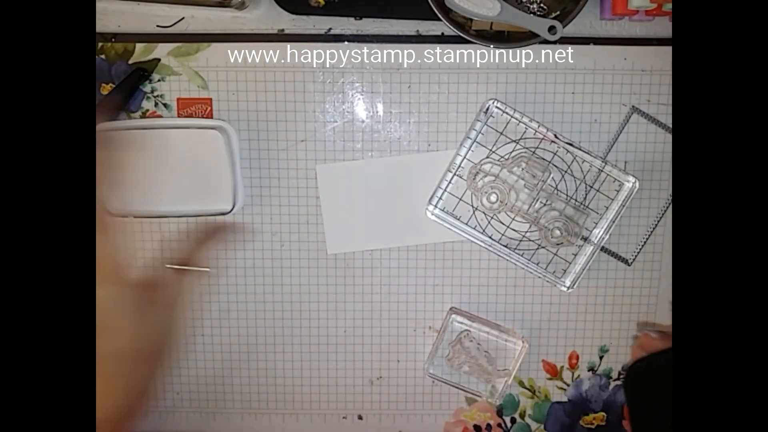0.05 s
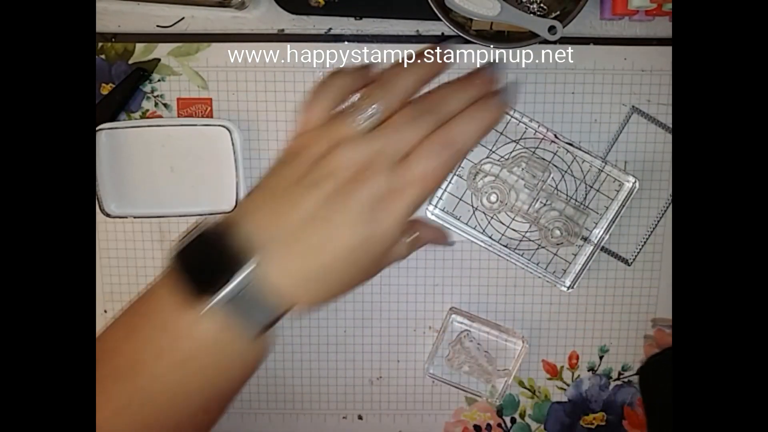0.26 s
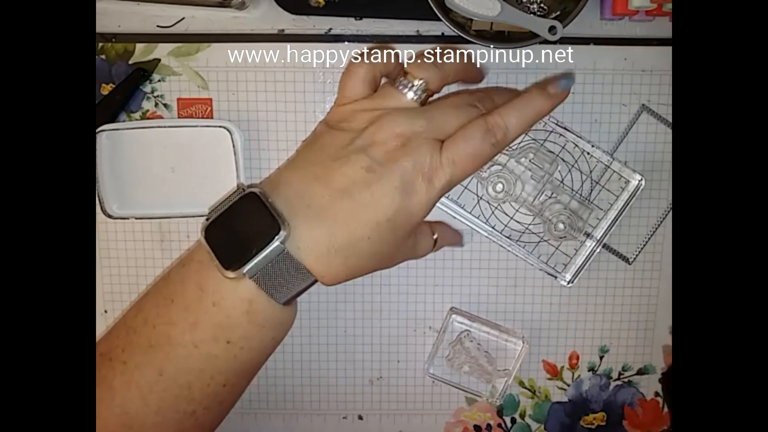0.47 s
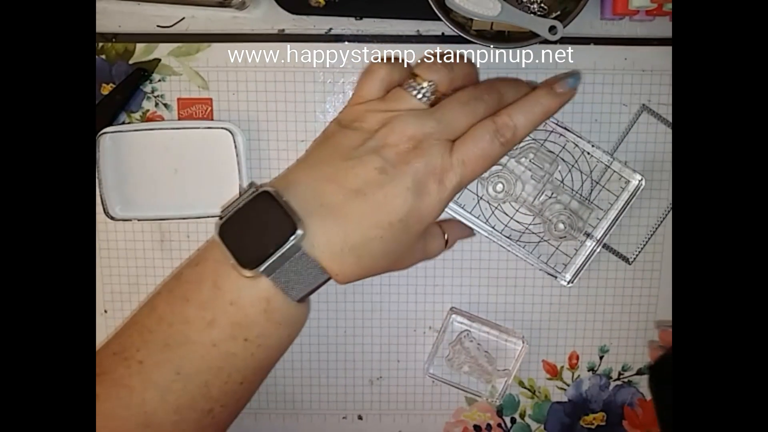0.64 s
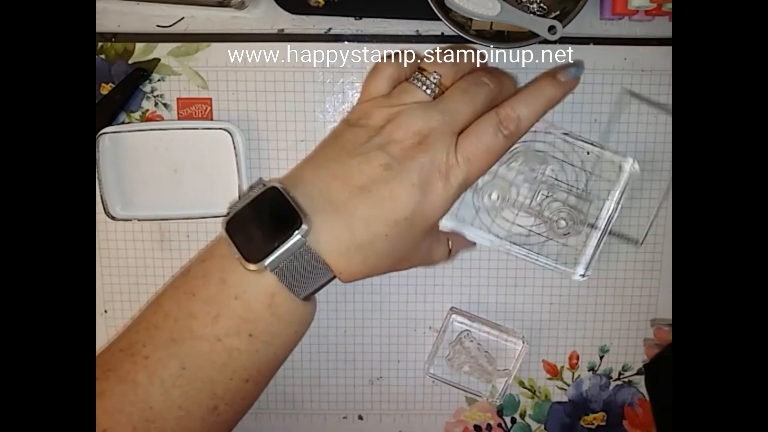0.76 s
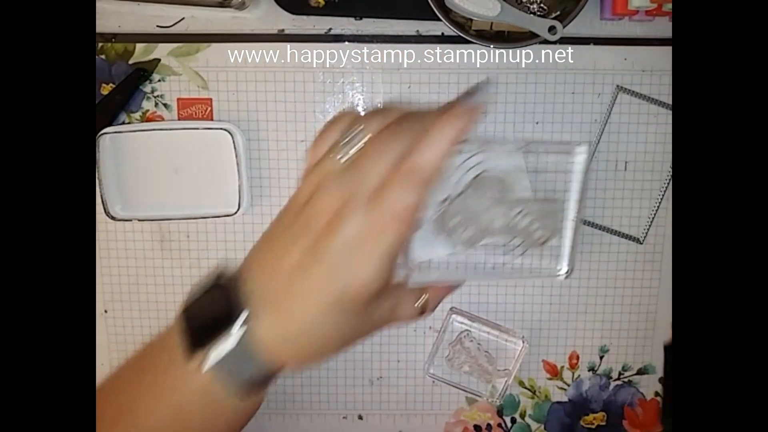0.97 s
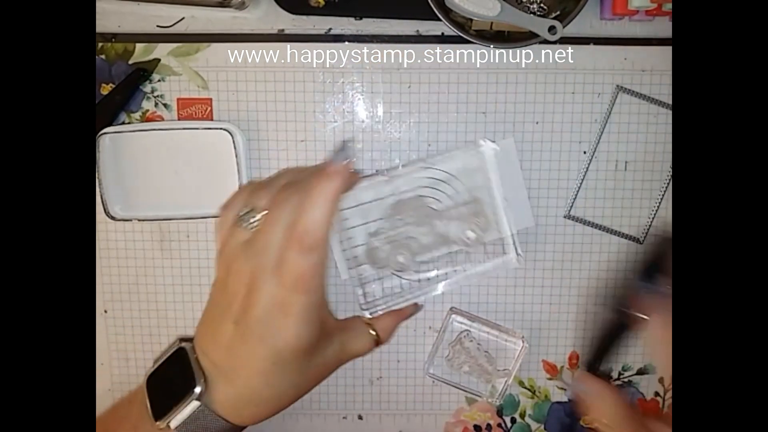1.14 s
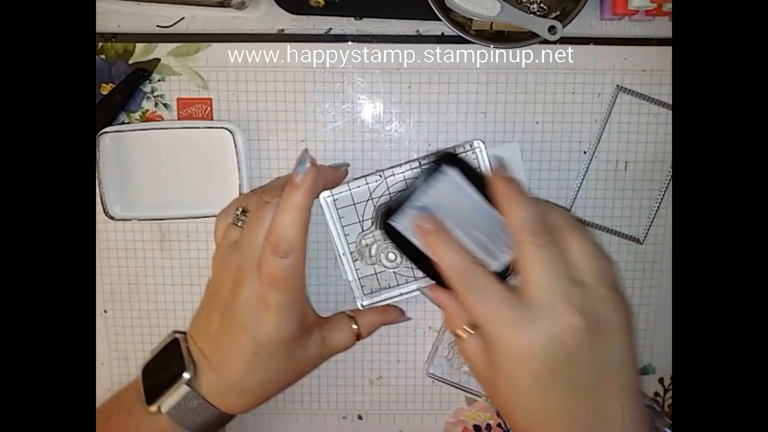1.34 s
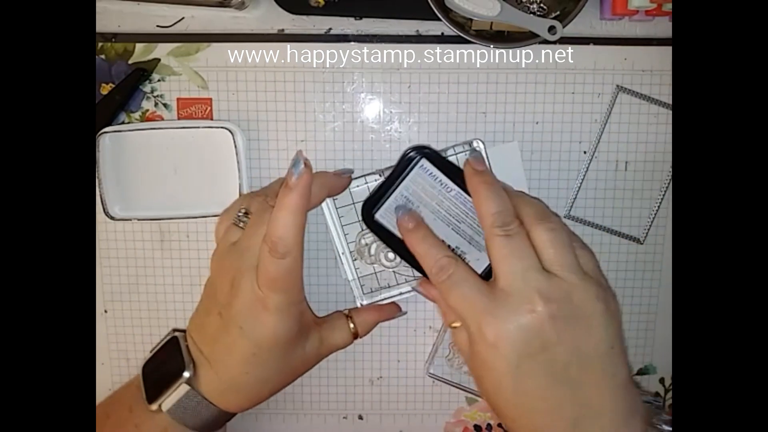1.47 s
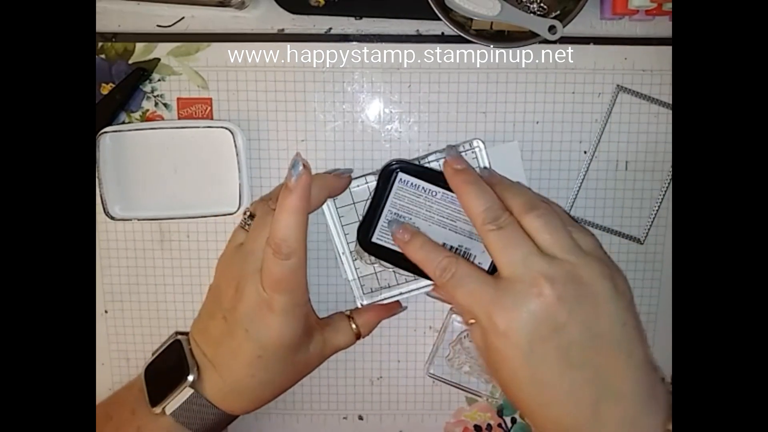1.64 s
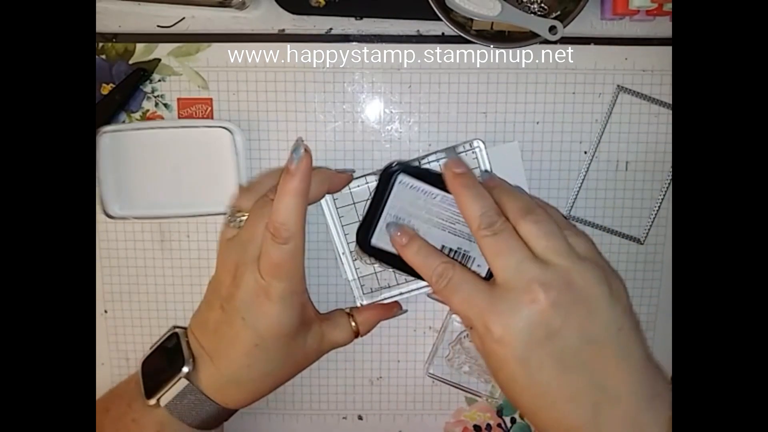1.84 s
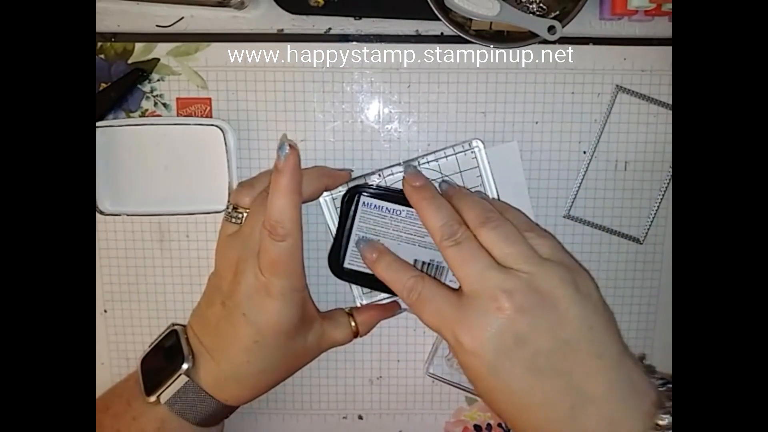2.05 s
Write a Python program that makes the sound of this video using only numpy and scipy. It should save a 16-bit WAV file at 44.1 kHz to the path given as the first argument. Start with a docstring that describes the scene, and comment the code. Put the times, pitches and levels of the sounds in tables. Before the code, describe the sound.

Close up in a small, lightly reverberant room, a hard plastic block rattles loudly, soft bumps and a metal clink follow, then a brief scrape, a woody set-down thump and scattered sticky taps over faint low rumble.

```python
"""Close up at a craft table in a small room, a hand slides in and knocks an acrylic block, which rattles.
Soft bumps of hand and pad begin, a metal ring clinks twice, and the block's edge drags briefly over paper.
The block is set down with a thump, among bumps and sticky ticks of nails, plastic and ink that go on to the end.
Hard contacts are short noise bursts and ringing tones; rubbing is a stream of random jolts.
The room adds reverberation to all of these, over a steady low rumble and hiss."""
import sys
import numpy as np
from scipy import signal
from scipy.fft import rfft, irfft
from scipy.io import wavfile

SR = 44100
rng = np.random.default_rng(int(sys.argv[2]) if len(sys.argv) > 2 else 0)


def pcm_store(signal):
    """Save signal as 16-bit PCM."""
    levels = np.round(np.clip(np.atleast_2d(signal), -1, 1) * 32767)
    wavfile.write(sys.argv[1], SR, levels.astype(np.int16).T)


N = 92610  # length in samples: 2.1 s


def from_db(db):
    """Turn decibels into a multiplier."""
    return 10 ** (np.asarray(db) / 20)


def rms_one(x):
    """Scale a sound to an average power of one."""
    return x / np.sqrt(np.mean(x ** 2) + 1e-20)


def at_hz(points, hz, axis=1):
    """Read a table column between its rows, with frequency spaced by ratio as the ear hears it."""
    points = np.array(points)
    return np.interp(np.log(hz + 1e-9), np.log(points[:, 0]), points[:, axis])


def convolve(x, response):
    """Let every sample of a sound set off a copy of the response."""
    return signal.fftconvolve(x, response)[:N]


def colour(x, spectrum):
    """Filter a sound to a spectrum with minimum phase, so that nothing sounds before its cause."""
    size = 8192
    hz = np.arange(size // 2 + 1) * SR / size
    cepstrum = irfft(np.log(from_db(at_hz(spectrum, hz))))
    # folding the cepstrum's second half onto its first gives minimum phase
    fold = np.r_[1, np.full(size // 2 - 1, 2), 1, np.zeros(size // 2 - 1)]
    return convolve(x, irfft(np.exp(rfft(cepstrum * fold))))


def clicks(rows):
    """Place a one-sample push for each (time [s], level [dB])."""
    out = np.zeros(N)
    for s, db in rows:
        out[int(np.clip(s * SR, 0, N - 1))] += from_db(db)
    return out


def bursts(rows, decay_s):
    """Place a flurry of tiny contacts, as fast-dying noise, for each (time [s], level [dB])."""
    size = 4096
    out = np.zeros(N + size)
    dying = from_db(-60 * np.arange(size) / SR / decay_s)
    for s, db in rows:
        spectrum = rfft(rng.standard_normal(size) * dying)
        flat = irfft(spectrum / np.abs(spectrum))  # every frequency equally strong
        flurry = flat * np.sqrt(dying)  # quieten what the flattening spread out in time
        start = int(np.clip(s * SR, 0, N - 1))
        out[start:start + size] += from_db(db) * flurry / np.linalg.norm(flurry)
    return out[:N]


def ring(force, modes):
    """Let a force set off a body's dying tones, whose signs alternate from one to the next."""
    t = np.arange(SR // 2) / SR
    response = np.zeros(len(t))
    for k, (hz, db, t60) in enumerate(modes):
        response += (-1) ** k * from_db(db - 60 * t / t60) * np.sin(2 * np.pi * hz * t)
    return convolve(force, response)


def friction(level, spectrum, modes):
    """Rub by stick and slip: random jolts excite a body, and a level curve sets the loudness."""
    slips_per_s, spread_db = 1800, 3.5  # average rate; spread of the jolts' strength
    happens = rng.random(N) < slips_per_s / SR
    strength = from_db(spread_db * np.clip(rng.standard_normal(N), -2, 2))
    slips = happens * strength * rng.choice([-1, 1], N)
    rub = rms_one(colour(slips, spectrum) + ring(slips, modes))
    s, db = np.transpose(level)
    # silent outside the curve
    return rub * from_db(np.interp(np.arange(N) / SR, s, db, left=-np.inf, right=-np.inf))


# clacks of the block: (time [s], level [dB], knock on the table relative to the clack [dB])
CLACKS = [(0.0565, -35, 3), (0.0705, -44, 5), (0.0865, -22.5, 6.5), (0.1122, -32, 8), (0.1272, -38.5, 4),
          (0.1388, 0.5, -11), (0.1455, -5.5, 5), (0.1490, -6.5, -2.5), (0.1580, -20, -2),
          (0.2140, -32.5, 18), (0.2355, -23.5, 2), (0.2530, -21.5, -5), (0.2634, -18, 2.5),
          (0.3095, -57, -14), (0.328, -62, 23)]
# tones of the acrylic: (frequency [Hz], level [dB], time to fall by 60 dB [s])
BLOCK_MODES = [(2035, -27.5, .03), (2370, -17.5, .018), (2540, -22, .04), (2680, -19, .028),
               (2840, -26, .05), (3850, -12, .015), (3975, -33.5, .06), (5020, -32.5, .03),
               (5330, -17.5, .008), (6250, -28, .012), (10860, -39.5, .025)]
# spectrum of the contact crack: (frequency [Hz], level [dB])
CRACK_SPECTRUM = [(200, -18), (700, -21), (1100, -3), (3200, 10), (5500, 7.5), (6600, 3), (7600, -9.5),
                  (11000, -12), (16000, -20.5)]
# spectrum of the knocked table top: (frequency [Hz], level [dB])
KNOCK_SPECTRUM = [(60, -20.5), (150, -5.5), (300, 6), (520, 11), (950, 5), (1600, 7), (3000, -8.5),
                  (9000, -34)]


def block_rattle():
    """Each clack cracks at the contact, rings the stiff acrylic and knocks the table under it."""
    hits = [(s, db) for s, db, weight in CLACKS]
    knocks = [(s, db + weight) for s, db, weight in CLACKS]
    tones = ring(clicks(hits), BLOCK_MODES)
    cracks = colour(bursts(hits, decay_s=.014), CRACK_SPECTRUM)
    table_knocks = colour(bursts(knocks, decay_s=.04), KNOCK_SPECTRUM)
    return tones + cracks + table_knocks


# spectrum of the snap of the block's edge: (frequency [Hz], level [dB])
SNAP_SPECTRUM = [(80, 9), (250, 17), (550, 13), (900, 7), (1500, 9.5), (2300, -9.5), (3000, -3.5),
                 (5500, -5.5), (8000, -20.5), (16000, -38)]
# tones of the set-down: the table top's low tones, and above 1 kHz the block's own thunk (frequency [Hz], level
# [dB], time to fall by 60 dB [s])
THUMP_MODES = [(89, -70, .3), (130, -37, .3), (205, -20, .05), (226, -26, .22), (335, -19.5, .035),
               (495, -34, .12), (1330, -22, .012), (1810, -22, .02), (3010, -24.5, .012)]


def set_down():
    """The block's edge snaps onto the table, then its weight makes the top boom and the block thunk."""
    snap_s, thump_lag_s = 1.2592, .0012
    snap = colour(bursts([(snap_s, 0)], decay_s=.012), SNAP_SPECTRUM)
    thump = ring(clicks([(snap_s + thump_lag_s, 0)]), THUMP_MODES)
    return snap + thump


# loudness of the drag: (time [s], level [dB])
DRAG_LEVEL = [(0.862, -90), (0.871, -56.5), (0.884, -48), (0.900, -41), (0.916, -39.5), (0.925, -41.5),
              (0.930, -60), (0.950, -77), (0.960, -83)]
# spectrum of the slips: (frequency [Hz], level [dB])
DRAG_SPECTRUM = [(200, -12), (1200, -14), (2300, -16.5), (3200, 5), (5300, 5), (7500, -18.5), (11000, -26),
                 (16000, -25)]
# tones the slips excite: (frequency [Hz], level [dB], time to fall by 60 dB [s])
DRAG_MODES = [(3580, -25.5, .012), (4280, -30.5, .01), (4530, -24.5, .02), (4910, -26.5, .02)]


def block_drag():
    """The block's edge sticks and slips over paper."""
    return friction(DRAG_LEVEL, DRAG_SPECTRUM, DRAG_MODES)


# clinks of the ring: (time [s], level [dB])
CLINKS = [(0.4386, 0), (0.5665, -19)]
# tones of the metal: (frequency [Hz], level [dB], time to fall by 60 dB [s])
RING_MODES = [(1443, -48, .02), (1790, -32.5, .025), (4850, -32, .014), (6174, -48, .04), (8280, -51, .08),
              (9110, -48, .05), (10245, -36, .06), (12400, -48, .05), (14450, -43, .045)]
# spectrum of the contact click: (frequency [Hz], level [dB])
RING_CLICK_SPECTRUM = [(200, -27), (900, -17), (1400, -15), (5000, -5.5), (7500, -24), (12000, -19),
                       (16000, -32)]


def ring_clinks():
    """A metal finger ring clicks on contact and rings briefly, mostly high up."""
    tones = ring(clicks(CLINKS), RING_MODES)
    return tones + colour(bursts(CLINKS, decay_s=.02), RING_CLICK_SPECTRUM)


# ticks of nails, plastic and tacky ink, and near 1.02 s a few scuffs of the block's edge: # (time [s], level
# [dB], ringing frequency [Hz], extra level of the ringing [dB])
TICKS = [(0.390, -13, 2600, 2.5), (0.6765, -11.5, 5500, -6.5), (0.8272, -0.5, 6800, -12.5),
         (1.0130, -12, 4500, 17), (1.0195, -8, 3650, 8.5), (1.0285, -6, 3600, 10), (1.0310, -9, 4450, 5),
         (1.141, -12.5, 3600, -1.5), (1.2372, 5, 3700, 6), (1.4128, -8, 2390, 8.5),
         (1.4185, -10.5, 4000, 4), (1.579, -6, 1600, -2.5), (1.662, -10, 5500, -15),
         (1.7320, -12.5, 4200, 7.5), (1.7850, 0.5, 5700, -3.5), (1.8888, 1.5, 5200, -0.5),
         (1.8960, 1.5, 6000, -13.5), (2.0215, 5, 5300, -3)]
# spectrum of the tick's snap: (frequency [Hz], level [dB])
TICK_SPECTRUM = [(200, -23), (1800, -39), (3200, -30.5), (5500, -24.5), (8000, -37), (16000, -43)]


def ticks():
    """Tiny bright contacts snap, and each excites one short resonance."""
    sound = colour(bursts([(s, db) for s, db, hz, extra_db in TICKS], decay_s=.009), TICK_SPECTRUM)
    for s, db, hz, extra_db in TICKS:
        mode = (hz, -46, .016)  # frequency [Hz], base level [dB], time to fall by 60 dB [s]
        sound = sound + ring(clicks([(s, db + extra_db)]), [mode])
    return sound


# soft bumps of hand and pad: (time [s], level [dB])
BUMPS = [(0.199, -4), (0.236, 7), (0.440, 2.5), (0.567, 3.5), (0.600, -15), (0.775, -6), (0.876, 3),
         (0.915, 6), (1.060, -23), (1.137, -10), (1.413, -7.5), (1.568, 7.5), (1.582, 5), (1.893, -4.5),
         (1.956, -7)]
# low tones of a bump: (frequency [Hz], level [dB], time to fall by 60 dB [s])
BUMP_MODES = [(115, -55, .12), (186, -49, .06), (260, -51.5, .035), (390, -55.5, .025)]


def soft_bumps():
    """Soft hand and pad contacts excite only a few low, short tones."""
    return ring(clicks(BUMPS), BUMP_MODES)


# loudness of the slide: (time [s], level [dB])
SLIDE_LEVEL = [(0, -42), (0.012, -40.5), (0.028, -47), (0.05, -43.5), (0.075, -57.5), (0.11, -62.5),
               (0.14, -68), (0.16, -108)]
# spectrum of the slips: (frequency [Hz], level [dB])
SLIDE_SPECTRUM = [(70, -14.5), (200, 9), (500, 7.5), (900, -2), (1500, 8.5), (2500, -11.5), (5000, -9),
                  (8000, -22.5), (16000, -24.5)]
# squeaking tones: (frequency [Hz], level [dB], time to fall by 60 dB [s])
SLIDE_MODES = [(1490, -45, .03), (1700, -29, .02), (4770, -32.5, .06), (4950, -37, .02)]


def hand_slide():
    """The hand sticks and slips over the table, exciting squeaking resonances."""
    return friction(SLIDE_LEVEL, SLIDE_SPECTRUM, SLIDE_MODES)


# the room: (frequency [Hz], reverberation level [dB], time to fall by 60 dB [s])
ROOM = [(100, -6.5, .45), (250, -11, .38), (700, -7, .34), (1800, -13, .3), (4200, -12, .33),
        (7000, -13.5, .28), (14000, -12.5, .2)]


def room(x):
    """Scattered reflections build up, then die away at a different speed in each frequency band."""
    build_up_s = .012
    t = np.arange(SR // 2) / SR
    response = np.zeros(len(t))
    edges = np.geomspace(50, 18000, 15)
    for low, high in zip(edges, edges[1:]):
        hz = np.sqrt(low * high)  # middle of the band
        band_filter = signal.butter(2, [low, high], "band", fs=SR, output="sos")
        band = signal.sosfilt(band_filter, rng.standard_normal(len(t)))
        decay = from_db(-60 * t / at_hz(ROOM, hz, axis=2))
        tail = band * decay * (1 - np.exp(-(t / build_up_s) ** 2))
        share = np.sqrt(2 * (high - low) / SR)  # wider bands carry more energy
        response += tail / np.linalg.norm(tail) * share * from_db(at_hz(ROOM, hz))
    return convolve(x, response)


# spectrum of the background: (frequency [Hz], level [dB])
FLOOR_SPECTRUM = [(15, -31), (25, -19.5), (44, -16.5), (134, 0), (354, -11.5), (439, -15.5), (560, -17),
                  (818, -26), (887, -20.5), (1610, -26), (2690, -28), (5280, -31.5), (16000, -40.5)]


def background():
    """Steady random noise, strongest at low frequencies, gives a rumble and faint hiss."""
    level_db = -63
    return from_db(level_db) * rms_one(colour(rng.standard_normal(N), FLOOR_SPECTRUM))


def scene():
    """All handling sounds, direct and through the room, over the background."""
    block = block_rattle() + set_down() + block_drag()
    hand = ring_clinks() + ticks() + soft_bumps() + hand_slide()
    table = block + hand
    return (table + room(table) + background())[None]


def record(dry):
    """A steep low-pass filter removes the very top of the treble."""
    cutoff_hz = 15900
    low_pass = signal.ellip(10, .1, 70, cutoff_hz, fs=SR, output="sos")
    return signal.sosfilt(low_pass, dry)


dry = scene()
out = record(dry)
pcm_store(out)
```